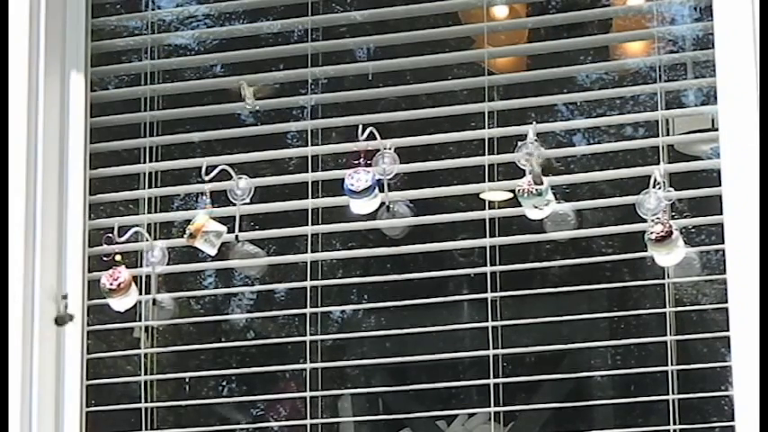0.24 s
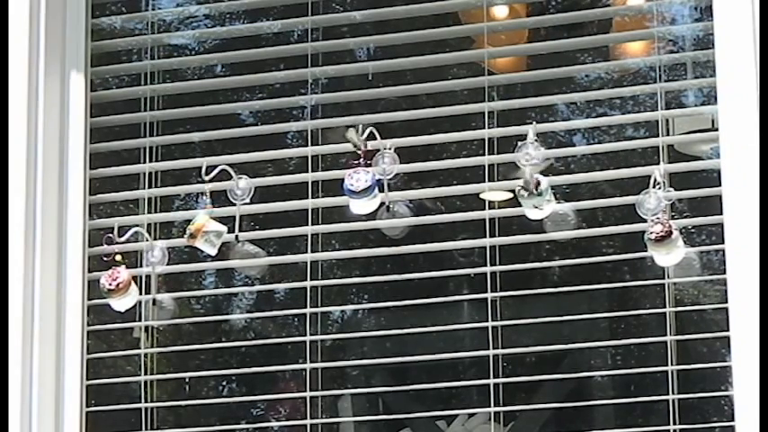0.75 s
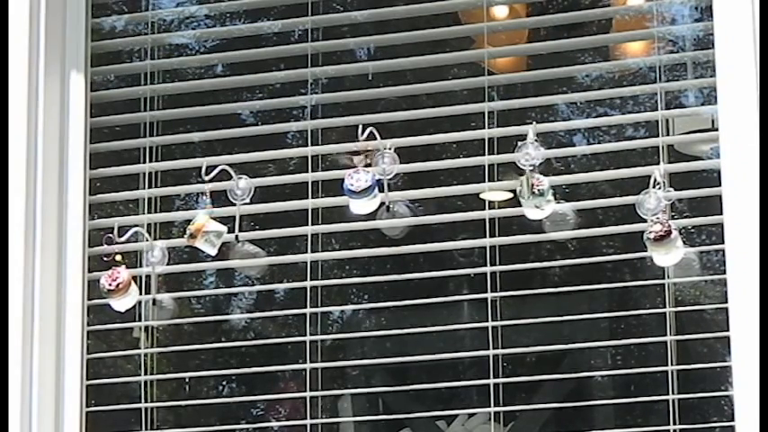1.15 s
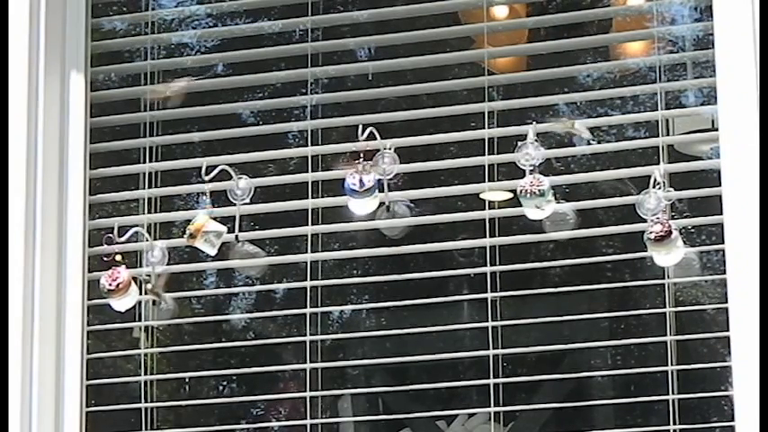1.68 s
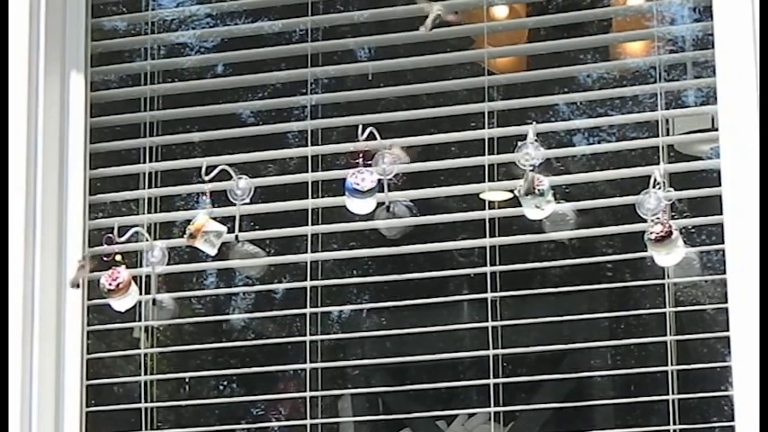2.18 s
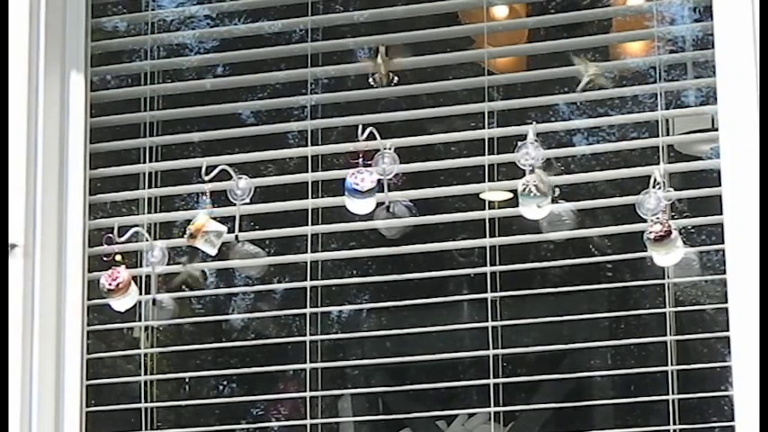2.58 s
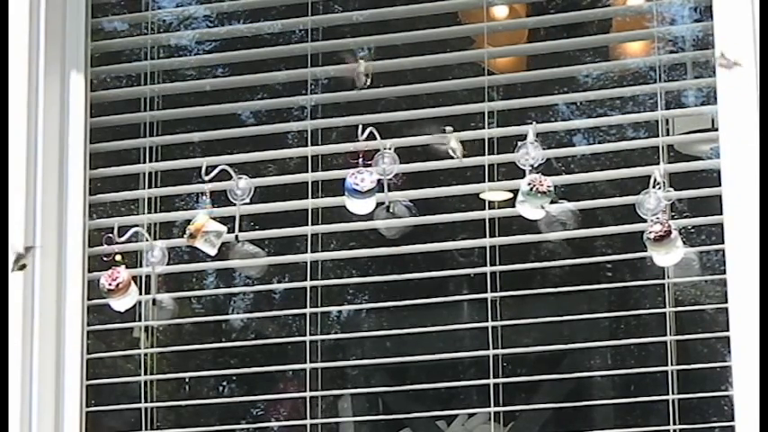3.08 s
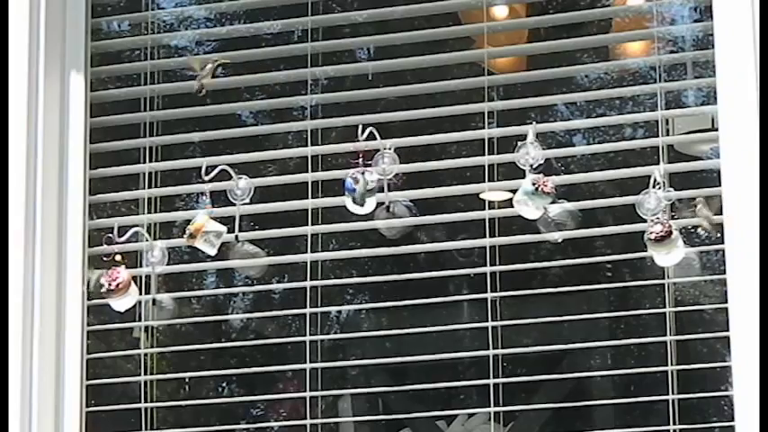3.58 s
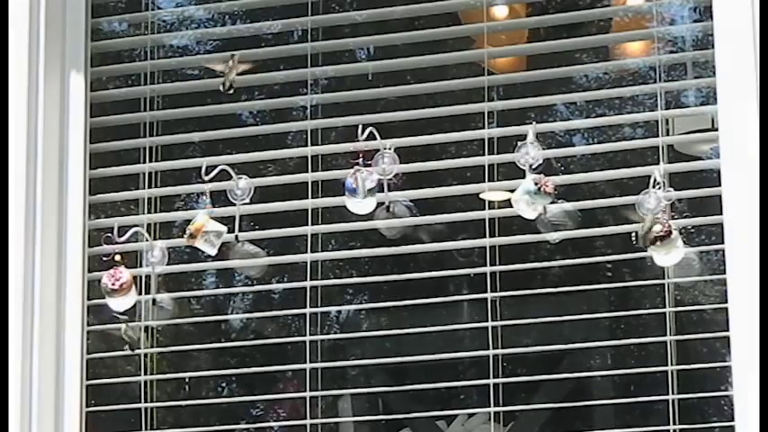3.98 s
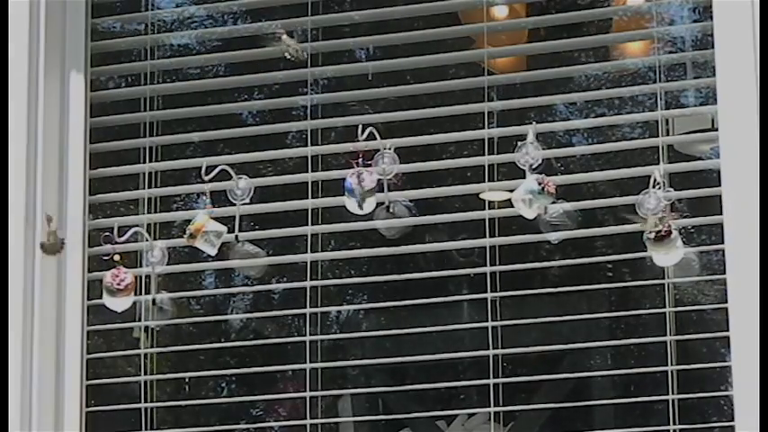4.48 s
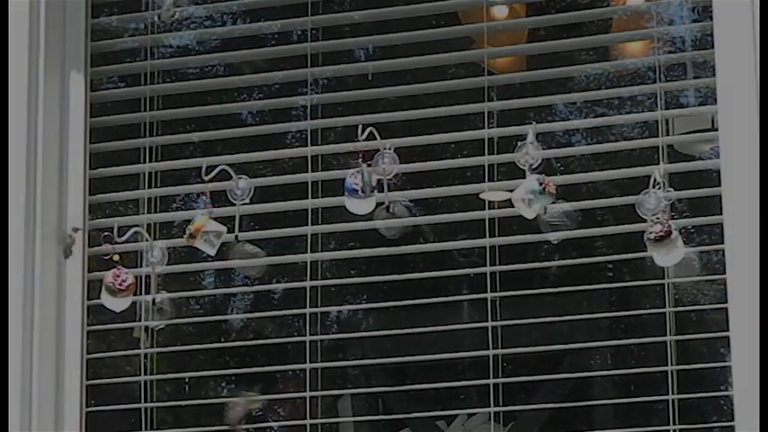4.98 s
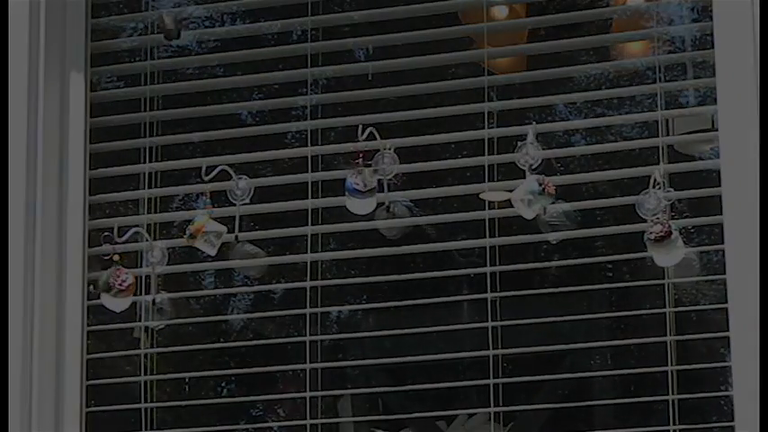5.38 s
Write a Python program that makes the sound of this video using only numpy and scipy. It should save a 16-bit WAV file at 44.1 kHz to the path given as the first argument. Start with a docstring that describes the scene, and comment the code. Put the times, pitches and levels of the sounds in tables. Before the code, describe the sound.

Close outdoor stereo microphone by a house window: low rumble and soft hiss throughout, with fluttering wing hums swelling as small birds pass. Sharp, high, downward chips come in bursts, often started by a harsh tiny rasp. A two-voiced squeal and a clear whistle come mid-way, slightly to the right. Late on, a low thump bumps the microphone just before the strongest chatter, ending in another squeal and wing hum.

```python
"""A rasp and falling chips open a squabble of hummingbirds at window feeders, over wing hum and low rumble.
Chips are diving harmonic stacks shaped by throat and beak; rasps are noise chopped by a slapping membrane.
Squeals pair two drifting voices; whistles are near-pure tones with an octave; glass and wall throw calls back.
Wings hum in harmonics of the beat, puffs of air nudge the microphone (one with a thump), and shaped noise
makes the outdoor rumble and hiss."""
import sys
import numpy as np
from scipy import signal
from scipy.fft import rfft, irfft
from scipy.io import wavfile
from scipy.ndimage import uniform_filter1d

SR = 44100
rng = np.random.default_rng(int(sys.argv[2]) if len(sys.argv) > 2 else 0)


def generate_wav(signal):
    """Clip the signal to [-1, 1] and save it as 16-bit WAV at the path in sys.argv[1]."""
    frames = np.transpose(np.atleast_2d(signal))
    scaled = np.clip(frames, -1, 1) * 32767
    pcm = np.round(scaled).astype(np.int16)
    wavfile.write(sys.argv[1], SR, pcm)


N = 249165
T = np.arange(N) / SR

# Chips, short notes that dive in pitch: centre_s, centre_pitch_hz, fall_hz_per_s, length_s,
# level_db, roughness (0-1), overtones_db, beak_hz
CHIPS = [(.154, 2400, 48200, .022, -47, 0.05, 6.5, 7700), (.222, 2175, 48000, .027, -48.5, 0.1, 0.5, 7300),
         (.314, 2282, 56000, .018, -49.5, 0.03, 0, 7400), (1.234, 2500, 40200, .018, -51.5, 0.33, -3, 7000),
         (1.419, 3050, 116800, .023, -44, 0, 4.5, 7900), (1.476, 3100, 123000, .015, -47.5, 0.08, 5, 6000),
         (1.526, 2900, 118000, .02, -46, .06, 0, 7200), (1.583, 2700, 104000, .02, -47.5, 0, 7, 7950),
         (1.673, 2800, 112200, .02, -48, 0.07, 5, 7300), (2.71, 2200, 39800, .022, -52, 0.47, 4, 7000),
         (2.906, 2280, 52200, .022, -49.5, 0.15, -1.5, 7200),
         (2.957, 2190, 49600, .022, -51.5, 0.25, -4, 5200), (3.023, 2250, 36300, .024, -49.5, 0.3, 1, 7000),
         (3.323, 1980, 43700, .034, -52.5, 0.32, -2, 5170),
         (4.87, 3130, 121500, .023, -45.5, 0.18, 3, 7660),
         (4.92, 3170, 124000, .017, -45.5, 0.12, -1, 6800),
         (4.973, 3020, 115000, .018, -43.5, 0.17, 4, 7700), (5.04, 2870, 124300, .017, -44, 0, 2, 6700),
         (5.11, 2650, 86000, .019, -45, .1, 1, 7000), (5.363, 2400, 50000, .02, -54.5, 0.47, 4, 5200)]
# Throat colour of the chips: frequency_hz, gain_db
THROAT = [(1400, 6), (2000, 3.5), (2480, 6.5), (2950, 3.5), (3550, 3), (4500, -1), (5800, 0), (7600, 1),
          (9500, 0.5), (11500, -7), (15000, -16)]
# Strength of a chip's partials, from the fundamental up: level_db
PARTIALS_DB = [3, 0, -0.5, -2.5, 0, -7]
# Drift of those partials as the chip dives, weight passing from octave to fundamental: change_db_per_s
PARTIALS_DB_PER_S = [238, -220, 20, -50, -50, -50]
CHIP_HISS_DB = -11
BEAK_DB, BEAK_WIDTH_HZ = 4.5, 1500

# Rasps, longer and harsh, often opening a run of chips: centre_s, length_s, level_db, treble_db,
# beak_hz, throat_ring_hz
RASPS = [(.06, 0.049, -47.5, 2, 7000, 2500), (1.362, 0.046, -47, 4, 8150, 5600),
         (2.803, 0.042, -53, -5, 7960, 3100), (3.134, 0.065, -52, -5.5, 7800, 3870),
         (4.681, 0.039, -56.5, 2, 8000, 5300), (4.801, 0.045, -46, 5, 8900, 5340)]
# Low throat resonance of a rasp, also in the chips' hiss: frequency_hz, gain_db
RASP_BODY = [(1000, -31), (1900, -1), (2800, 1), (3700, -1.5), (4600, -1), (8000, -42)]
# Treble of a rasp, also in the chips' hiss: frequency_hz, gain_db
RASP_TREBLE = [(3000, -31), (4400, -6), (5300, 0), (6300, -3), (9300, -1), (11200, -9), (15500, -28)]
# Falling voice that emerges from a rasp: time_from_centre (note lengths), pitch_hz
RASP_PITCH = [(-.5, 4210), (0, 3200), (.3, 2690), (.5, 1890)]
RASP_VOICE_DB = -9
SLAPS_PER_S = 270  # average; the membrane slaps unevenly
RING_DB, RING_WIDTH_HZ = 4.5, 190

# Squeal whose two voices part, waver, rejoin and dive: time_s, lower_hz, upper_hz, level_db, sum_tone_db
WAVERING_SQUEAL = [(2.168, 3740, 3743, -64, 9), (2.177, 3710, 3776, -55, 0), (2.183, 3555, 3740, -51, -9),
                   (2.187, 3380, 3705, -49, 2), (2.192, 3094, 3536, -48, 0), (2.201, 2593, 3533, -47, -4),
                   (2.209, 2525, 3550, -47, -4), (2.216, 2845, 3634, -46, 3), (2.224, 3020, 3860, -44, 2.5),
                   (2.231, 2890, 3600, -45.5, 4), (2.237, 2700, 3020, -49, -1.5),
                   (2.248, 2380, 2500, -59, 6)]
# Squeal whose upper voice arches before both dive: time_s, lower_hz, upper_hz, level_db, sum_tone_db
ARCHED_SQUEAL = [(5.141, 3776, 3800, -61, 0), (5.154, 3710, 3784, -52, -17), (5.162, 3510, 3750, -45, -17),
                 (5.166, 3450, 3730, -45, -7), (5.178, 3170, 3740, -41.5, -8),
                 (5.191, 3144, 4040, -44.5, -4), (5.2, 3197, 4050, -41.5, -13),
                 (5.205, 3130, 3770, -45, 0.5), (5.211, 3040, 3110, -44, -4), (5.218, 2430, 2600, -57, 0)]
# Voicing of each squeal: shape (a table above), upper_voice_db, fringe_tones_db, rough_edge_db
SQUEAL_CALLS = [(WAVERING_SQUEAL, 3.1, -1, -7.5), (ARCHED_SQUEAL, -2, -4.5, -11.5)]
# Fringe tones that the two voices make together: lower_voice (cycles), upper_voice (cycles)
FRINGE_CYCLES = [(-1, 2), (2, 0), (3, 0), (2, 1), (1, 2), (0, 3), (3, 1), (2, 2), (1, 3)]
# Balance of the fringe tones, in the same order: level_db
FRINGE_DB = [-10, -16, -16.5, -18, -22.5, -15, -17, -22, -26]
# Rough edge of a squeal: frequency_hz, gain_db
SQUEAL_EDGE = [(1500, -18), (2800, -1), (4500, -2), (6500, 1), (9000, -3), (12000, -3), (14000, -9),
               (15500, -28)]

# Whistle whose level dips briefly, then fades: time_s, pitch_hz, level_db, octave_db
WHISTLE = [(2.568, 6170, -49, -12), (2.572, 6530, -46, -7), (2.6, 6600, -44, -6), (2.614, 6530, -53, -5),
           (2.622, 6730, -44, -3), (2.632, 6710, -49, -3), (2.642, 6370, -52, -6), (2.659, 6340, -55, -11),
           (2.666, 6000, -63, -10)]
# Faint gliding peeps: start_s, length_s, first_hz, last_hz, level_db, octave_db
PEEPS = [(.57, .065, 7300, 7700, -65, -20), (1.045, 0.085, 7170, 6830, -64, -29),
         (4.34, 0.058, 6700, 6600, -69, -20), (4.56, 0.025, 6080, 6450, -51, -7)]
PEEP_ATTACK_SHARE, PEEP_ONSET_DB, PEEP_FADE_DB = .25, -10, -5.5

# Wingbeat spectrum: multiple (of the wingbeat), level_db
WING = [(2, -3), (3, -9.5), (4, -1), (5, -6.5), (6, -8.5), (7, -19.5), (9, -18)]
# Birds darting close by: nearest_s, span_s (time to cover the miss distance), wingbeat_hz, level_db
PASSES = [(.07, 0.072, 50.08, -52), (.27, 0.031, 57.1, -55), (.74, 0.033, 52.1, -52.5),
          (1.42, 0.035, 53.98, -50), (1.58, 0.025, 57.1, -55), (1.93, 0.059, 54.1, -59.5),
          (2.2, 0.059, 45.2, -50.5), (2.66, 0.043, 53.74, -50), (3.1, 0.19, 44.72, -55),
          (3.77, 0.041, 52.7, -51), (3.97, 0.057, 43.4, -53), (4.22, 0.025, 49.24, -49),
          (4.54, 0.016, 53.7, -45.5), (4.79, 0.033, 51.96, -48), (4.97, 0.014, 48.1, -51),
          (5.2, 0.055, 51.75, -55), (5.5, 0.033, 51.9, -52.5)]
HOVER_DB = -68  # birds hovering at the feeders
DOPPLER_SHARE = .015  # the hum is higher as a bird nears, lower as it leaves

# Air on the microphone: centre_s, half_length_s, pitch_hz, level_db, left_minus_right_db, left_lag_rad
PUFFS = [(0.069, 0.034, 81, -44, 2, 0), (0.737, 0.019, 80, -46, -2, -0.15),
         (4.671, 0.012, 88.5, -22.5, -12, 1.7), (4.694, 0.0059, 80.7, -17, 0, -1.57),
         (4.78, 0.0067, 75.4, -33.5, -5, -0.53), (4.897, 0.026, 70, -37.5, 12.5, -2.1)]
# Colour of the outdoor background: frequency_hz, density_db (relative, per Hz)
AIR = [(15, -49), (25, -20), (75, -1.5), (113, -1), (144, -7.5), (204, -4.5), (260, -8), (305, -11),
       (552, -16), (614, -15.5), (666, -17.5), (2300, -20.5), (6210, -26), (7300, -25), (15500, -34.5)]
# Stereo width of the background: frequency_hz, side_minus_mid_db
AIR_SIDE = [(60, -9), (110, -0.5), (200, -3.5), (380, -0.5), (700, 0), (1290, -1), (2380, -1.5), (4400, -2),
            (8120, -1.5), (15000, 1)]
AIR_DB = -49
TOP_HZ = 15750


def undb(db):
    """Decibels to gain."""
    return 10 ** (np.asarray(db) / 20)


def unit(x):
    """Scale to rms 1."""
    return x / np.sqrt(np.mean(x ** 2))


def noise():
    """White noise for the whole scene."""
    return rng.standard_normal(N)


def gain_at(hz, points):
    """Gain of a (Hz, dB) spectrum, read along log frequency."""
    f, db = np.transpose(points)
    return undb(np.interp(np.log(np.maximum(hz, 1)), np.log(f), db))


def colour(x, points):
    """Filter by a (Hz, dB) spectrum."""
    return irfft(rfft(x) * gain_at(np.fft.rfftfreq(N, 1 / SR), points), N)


def walk(rate):
    """Smooth random curve of rms 1 that changes about rate times a second."""
    f = np.fft.rfftfreq(N, 1 / SR)
    return unit(irfft(rfft(noise()) / (1 + (f / rate) ** 4), N))


def turn(hz):
    """Phase of an oscillator that follows a pitch curve."""
    return 2 * np.pi * np.cumsum(hz) / SR


def gesture(rows, size=130):
    """A soft on-off gate and the control curves of one call, rounded over size samples."""
    s, *columns = np.transpose(rows)
    gate = 1. * ((T > s[0]) & (T < s[-1]))
    curves = [gate] + [np.interp(T, s, c) for c in columns]
    return [uniform_filter1d(c, size) for c in curves]


def pan(x, db):
    """Place a sound by its left minus right level."""
    return x * undb(np.array([[db], [-db]]) / 2)


def beak(hz, centre_hz):
    """Gain of the open beak's resonance."""
    return undb(BEAK_DB * np.exp(-((hz - centre_hz) / BEAK_WIDTH_HZ) ** 2))


def note_span(s, length):
    """Samples of a short note, their times from its centre, and its flat-topped swell."""
    i = np.flatnonzero(abs(T - s) < length)
    t = T[i] - s
    return i, t, np.exp(-(2.15 * t / length) ** 4)


def chips(jitter=0.106, jitter_hz=800, shimmer_db=4.5, shimmer_hz=330, count=6):
    """Harmonic stacks dive in pitch through throat and beak resonances, hissier the rougher they are."""
    out, shake = np.zeros(N), walk(jitter_hz)
    # every partial flickers on its own
    shimmer = [undb(shimmer_db * walk(shimmer_hz)) for _ in range(count)]
    breath = colour(noise(), RASP_BODY) + colour(noise(), RASP_TREBLE)
    hiss = undb(CHIP_HISS_DB) * unit(breath)
    for s, pitch_hz, fall_hz_per_s, length, db, rough, over_db, beak_hz in CHIPS:
        i, t, swell = note_span(s, length)
        dive_hz = np.maximum(pitch_hz - fall_hz_per_s * t, pitch_hz / 2)
        hz = dive_hz * np.exp(jitter * rough * shake[i])
        phase = turn(hz)
        note = 0
        for k in range(1, count + 1):
            partial_db = PARTIALS_DB[k - 1] + PARTIALS_DB_PER_S[k - 1] * t + over_db * (k > 1)
            resonance = gain_at(k * hz, THROAT) * beak(k * hz, beak_hz)
            audible = k * hz < SR / 2  # avoids aliasing
            level = resonance * undb(partial_db) * audible * shimmer[k - 1][i]
            note = note + level * np.sin(k * phase)
        breathy = np.clip(rough, 0, 1)
        voice = np.sqrt(1 - breathy) * unit(swell * note) * np.sqrt(np.mean(swell ** 2))
        out[i] += undb(db) * (voice + (1 + 2 * breathy) * swell * hiss[i])
    return out


def rasps(unevenness=0.28, depth=0.36, jitter=0.069, jitter_hz=700):
    """An unevenly slapping membrane chops air into a ringing buzz; a rough falling voice emerges."""
    out, shake = np.zeros(N), jitter * walk(jitter_hz)
    slap_hz = SLAPS_PER_S * (1 + unevenness * walk(146))
    slaps = 1 + depth * np.cos(turn(slap_hz))
    body, treble = (colour(slaps * noise(), points) for points in (RASP_BODY, RASP_TREBLE))
    for s, length, db, treble_db, beak_hz, ring_hz in RASPS:
        i, t, swell = note_span(s, length)
        f = np.fft.rfftfreq(len(i), 1 / SR)
        ring = undb(RING_DB * np.exp(-((f - ring_hz) / RING_WIDTH_HZ) ** 2))
        airflow = body[i] + undb(treble_db) * treble[i]
        buzz = unit(irfft(rfft(airflow) * beak(f, beak_hz) * ring, len(i)))
        hz = np.interp(t / length, *np.transpose(RASP_PITCH)) * np.exp(shake[i])
        voiced = np.clip(.5 + t / length, 0, 1)
        voice = undb(RASP_VOICE_DB) * 2 * voiced * slaps[i] * np.sin(turn(hz))
        out[i] += undb(db) * swell * (np.sqrt(1 - voiced ** 4) * buzz + voice)
    return out


def squeal(shape, upper_db, fringe_db, edge_db, jitter=0.016, jitter_hz=780,
           flutter_db=1.0, flutter_hz=220, break_db=4, break_hz=110):
    """Two sides of the syrinx share one airflow: a sum tone, broken fringe tones and an edge that beats."""
    gate, low_hz, high_hz, db, sum_db = gesture(shape)
    a, b = (turn(hz * (1 + jitter * walk(jitter_hz))) for hz in (low_hz, high_hz))
    # each voice flutters in level
    lower, upper = (unit(undb(flutter_db * walk(flutter_hz))) * np.sin(phase) for phase in (a, b))
    voices = (lower + undb(upper_db) * upper) * np.sqrt(2 / (1 + undb(2 * upper_db)))
    sum_tone = np.sqrt(2) * undb(sum_db) * np.sin(a + b)
    fringe = 0
    for (m, n), tone_db in zip(FRINGE_CYCLES, FRINGE_DB):
        level = undb(fringe_db + tone_db + break_db * walk(break_hz))
        fringe = fringe + level * np.sin(m * a + n * b)
    beating = 1 + np.cos(a - b)
    edge = undb(edge_db) * unit(colour(noise(), SQUEAL_EDGE)) * beating
    return gate * undb(db) * (voices + sum_tone + fringe + edge)


def whistle(rows, jitter=0.00305):
    """A thin, nearly pure note with its octave."""
    gate, hz, db, octave_db = gesture(rows)
    phase = turn(hz * (1 + jitter * walk(320)))
    tone = np.sin(phase) + undb(octave_db) * np.sin(2 * phase)
    return np.sqrt(2) * gate * undb(db) * tone


def peep(start, length, first_hz, last_hz, db, octave_db):
    """A short whistle on a straight glide that swells quickly and fades."""
    rows = []
    for u, swell_db in [(0, PEEP_ONSET_DB), (PEEP_ATTACK_SHARE, 0), (1, PEEP_FADE_DB)]:
        hz = first_hz + u * (last_hz - first_hz)
        rows.append((start + u * length, hz, db + swell_db, octave_db))
    return whistle(rows)


def wing_hum(phase, gains):
    """Harmonics of one wingbeat, each from a random phase."""
    return sum(gain * np.sin(k * phase + rng.uniform(0, 2 * np.pi)) for (k, _), gain in zip(WING, gains))


def hovering_wings(wander=0.0395, swell_db=3):
    """Three birds hover, each humming on its own wavering wingbeat."""
    hover = 0
    for beat_hz, side_db in [(45, 8.0), (52.5, -8), (55, -1)]:
        phase = turn(beat_hz * (1 + wander * walk(4.85)))
        hum = wing_hum(phase, [undb(db + 2 * walk(10)) for _, db in WING])
        hover = hover + pan(hum * undb(swell_db * walk(1.7)), side_db)
    return unit(hover) * undb(HOVER_DB)


def passing_wings(wander=0.0306, side_db=-1.5):
    """Birds hum past, strongest when nearest, with a Doppler fall in pitch."""
    out, waver = 0, wander * walk(9.04)
    gains = [undb(db + 4.2 * walk(8.7)) for _, db in WING]
    for s, span, beat_hz, db in PASSES:
        along = (T - s) / span
        nearness = 1 / np.hypot(1, along)
        phase = turn(beat_hz * (1 + waver - DOPPLER_SHARE * along * nearness))
        out = out + pan(undb(db) * nearness * unit(wing_hum(phase, gains)), side_db)
    return out


def puffs():
    """Eddies push on each microphone port in brief low swings, unequally and out of step."""
    out = 0
    for s, half, hz, db, side_db, lag in PUFFS:
        push = -np.cos(2 * np.pi * hz * (T - s) - np.array([[lag], [0]]))
        swell = np.exp(-((T - s) / half) ** 2)
        out = out + pan(undb(db) * swell * push, side_db)
    return out


def outdoors(swell_db=0.02):
    """Low rumble and smooth far hiss from coloured noise, wide between the ears and almost steady."""
    mid, side = (unit(colour(noise(), AIR)) for _ in range(2))
    wide = mid + colour(side, AIR_SIDE) * np.array([[1], [-1]])
    return wide * undb(AIR_DB + swell_db * walk(0.56))


def house(x, side_db, glass_s, glass_db, tail_db, t60, build_s):
    """Direct sound, a quick echo off the window and a short scatter that builds from wall and eaves."""
    t = T[:SR // 2]
    decay = undb(-60 * t / t60)
    build = np.clip(t / build_s, 0, 1) ** 2
    scatter = rng.standard_normal((2, len(t))) * decay * build
    scatter /= np.sqrt(np.sum(scatter ** 2, axis=1, keepdims=True))
    echo = np.roll(x, int(glass_s * SR))
    tail = signal.fftconvolve(x[None], scatter, axes=1)[:, :N]
    return pan(x + undb(glass_db) * echo, side_db) + undb(tail_db) * tail


def scene():
    """Chatter from almost straight ahead, squeals and whistles a little to the right, wings and air."""
    chatter = house(chips() + rasps(), side_db=.4, glass_s=.0045, glass_db=-10,
                    tail_db=-6, t60=.22, build_s=.009)
    squeals = sum(squeal(*row) for row in SQUEAL_CALLS)
    whistles = whistle(WHISTLE) + sum(peep(*row) for row in PEEPS)
    calls = house(squeals + whistles, side_db=-4.0, glass_s=0.0022, glass_db=-26,
                  tail_db=-2.5, t60=0.31, build_s=0.014)
    return chatter + calls + hovering_wings() + passing_wings() + puffs() + outdoors()


def record(dry):
    """The recorder blocks steady pressure and cuts the top."""
    dry = signal.sosfilt(signal.butter(1, 8, "high", fs=SR, output="sos"), dry)
    return signal.sosfilt(signal.ellip(12, .1, 80, TOP_HZ, fs=SR, output="sos"), dry)


dry = scene()
out = record(dry)
generate_wav(out)
```